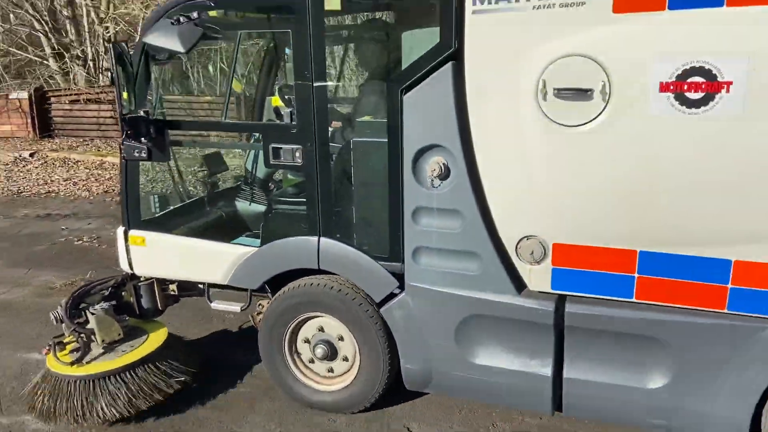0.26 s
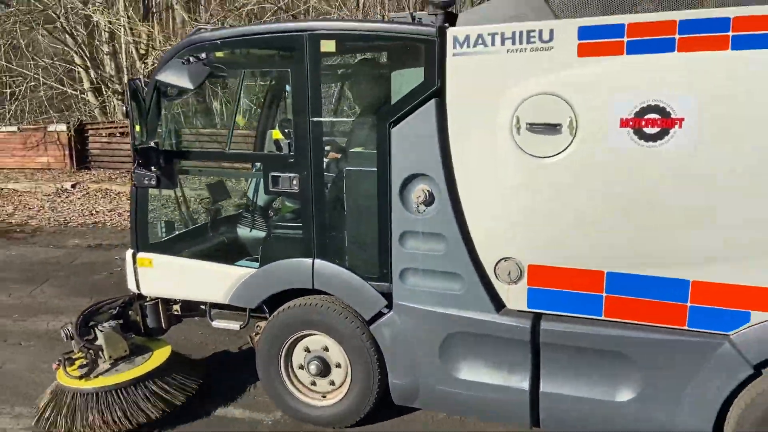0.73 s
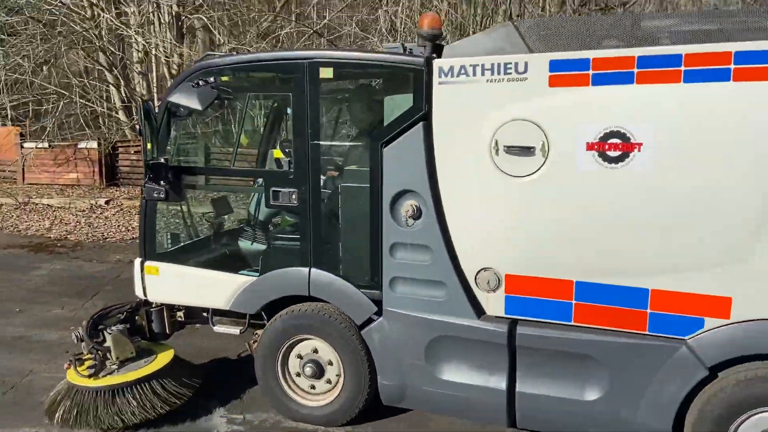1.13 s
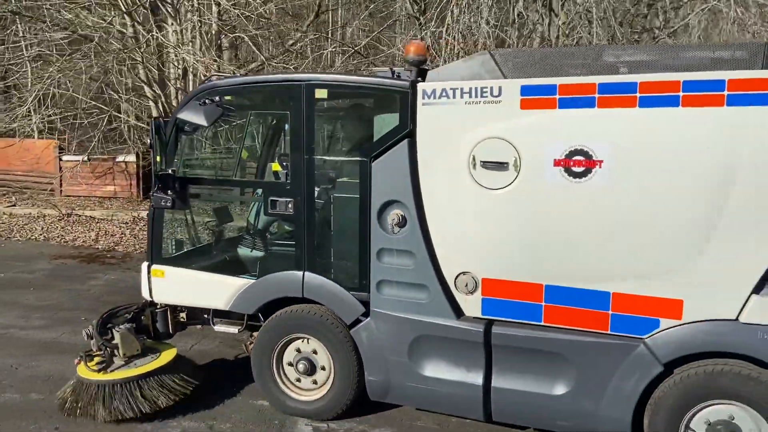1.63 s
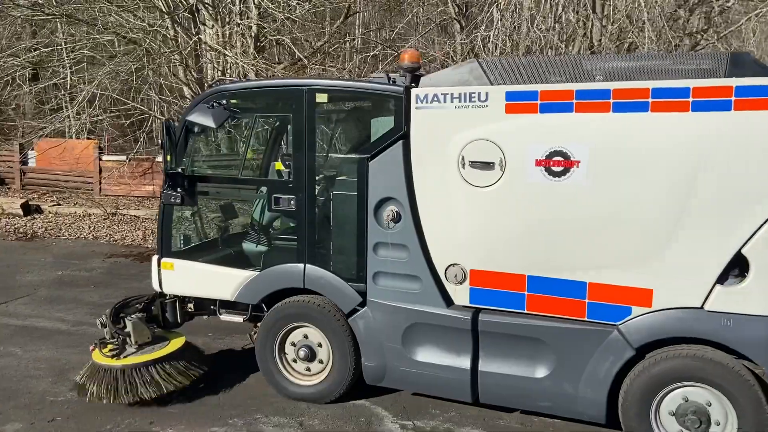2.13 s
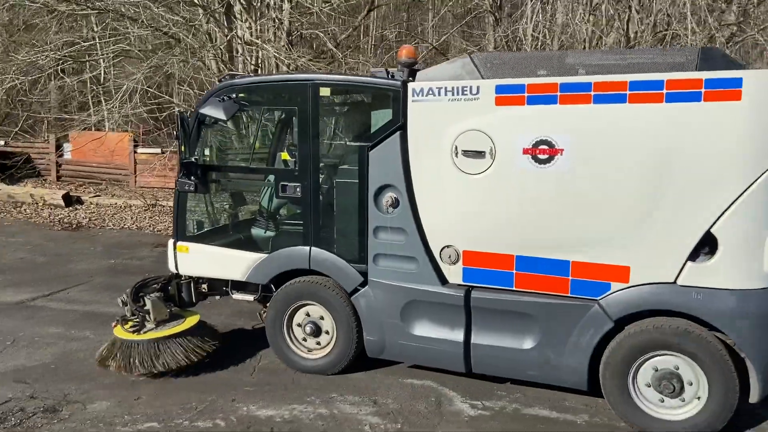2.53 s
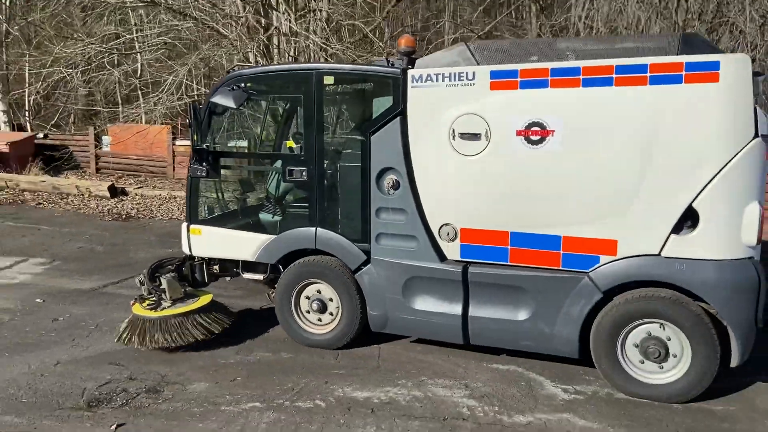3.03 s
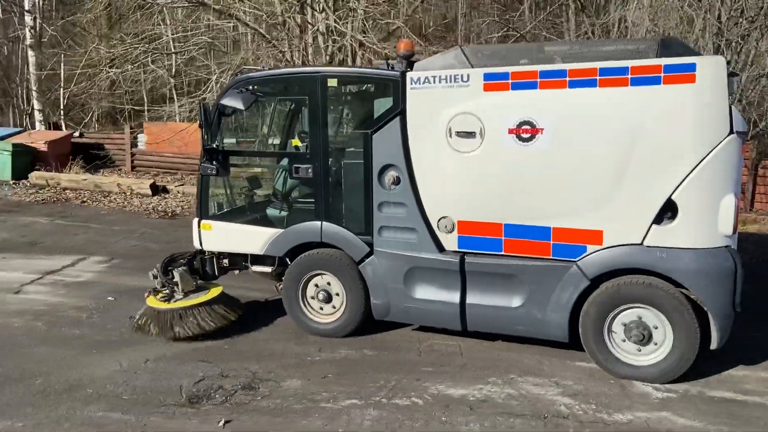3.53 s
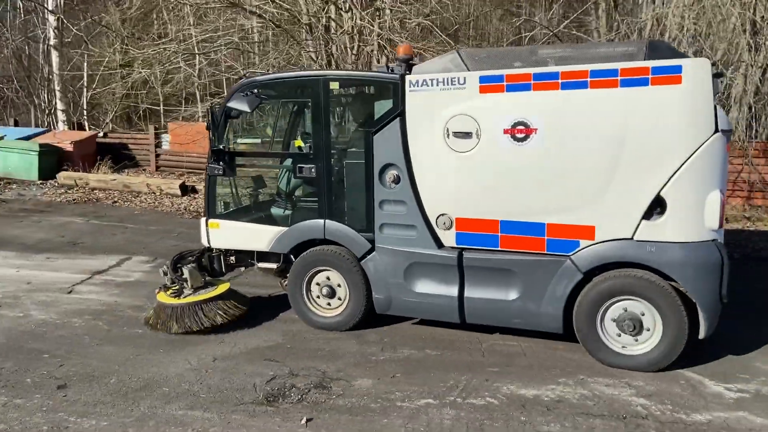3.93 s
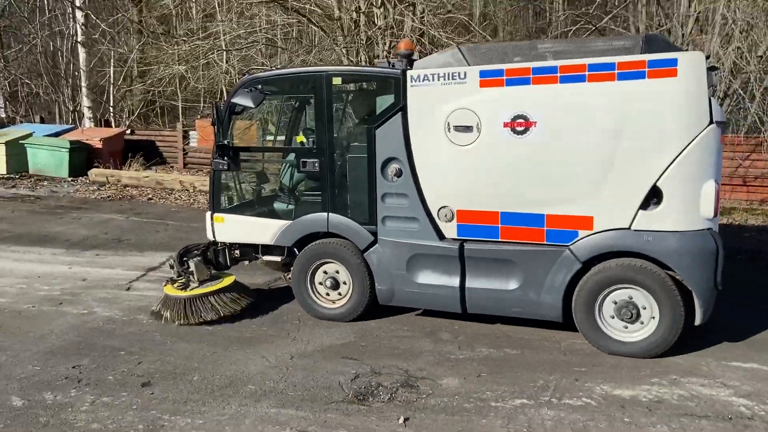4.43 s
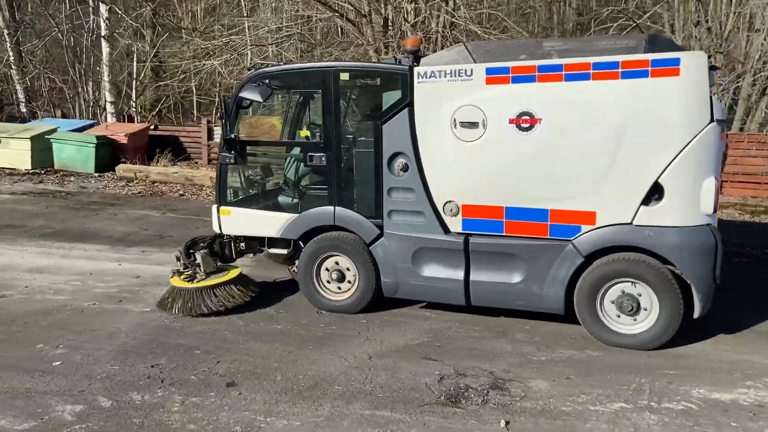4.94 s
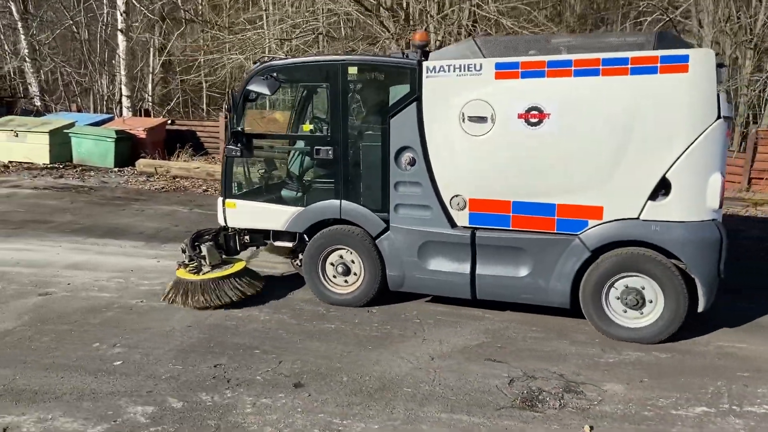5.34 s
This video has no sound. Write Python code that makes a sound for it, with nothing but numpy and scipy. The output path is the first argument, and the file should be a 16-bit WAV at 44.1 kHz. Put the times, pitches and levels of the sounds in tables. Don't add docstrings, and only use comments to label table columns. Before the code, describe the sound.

Steady diesel hum and hollow fan roar from a small sweeping machine, with constant bristle hiss, faint hydraulic whine and light wind buffeting.

```python
import sys
import numpy as np
from scipy import signal
from scipy.fft import rfft, irfft, next_fast_len
from scipy.io import wavfile

SR = 44100
rng = np.random.default_rng(int(sys.argv[2]) if len(sys.argv) > 2 else 0)


def wrap_up_sound(samples):
    columns = np.atleast_2d(samples).T
    tamed = np.clip(columns, -1, 1)
    steps = np.round(tamed * 32767).astype(np.int16)
    wavfile.write(sys.argv[1], SR, steps)


def convert_level_to_amplitude(level_db):
    exponent = np.asarray(level_db, float) / 20
    return 10 ** exponent


N = 245637
SIZE = next_fast_len(N + 4096)

# [t/s, engine firing rate f/Hz, fan blade rate f/Hz]
SHAFT_SPEEDS = [(0.0, 50.43, 306.92), (0.5, 50.322, 306.55), (1.0, 50.25, 306.06), (1.5, 50.307, 306.94),
                (2.0, 50.438, 308.07), (2.5, 50.515, 307.75), (3.0, 50.542, 307.68), (3.5, 50.438, 307.94),
                (4.0, 50.45, 308.34), (4.5, 50.495, 309.17), (5.0, 50.608, 309.69), (5.57, 50.628, 310.26)]


def rms_one(x):
    return x / np.sqrt(np.mean(x ** 2) + 1e-20)


def in_time(rows):
    s, *columns = np.transpose(rows)
    return [np.interp(np.arange(N) / SR, s, c) for c in columns]


def at_hz(points, hz, count=1):
    return np.interp(np.log(hz), np.log(np.array(points)[:, 0]), np.array(points)[:, count])


def bumps(rows):
    t = np.arange(N) / SR
    return sum(db * np.exp(-.5 * ((t - s) / half) ** 2) for s, db, half in rows)


def drift(rate):
    r = np.exp(-80 * np.pi * rate / SR)
    white = rng.standard_normal(N // 40 + 2002)
    slow = signal.lfilter([1], [1, -2 * r, r * r], white)[2000:]
    return np.interp(np.arange(N) / 40, np.arange(len(slow)), rms_one(slow))


def heard_db(near_db, spreading, follows=0, control_db=0):
    # [t/s, distance/m]
    distance = [(0, 2.62), (1.0, 3.34), (2.0, 3.26), (3.0, 3.77), (4.2, 4.5), (5.57, 4.65)]
    metres = in_time(distance)[0]
    return near_db - spreading * 20 * np.log10(metres / metres[0]) + follows * control_db


def tone(hz, level_db, wobble_db, wander, start=0):
    beat_peak_s = .082
    turns = np.cumsum(hz * np.ones(N)) / SR
    turns = turns - turns[round(beat_peak_s * SR)] + start
    phase = 2 * np.pi * turns + wander * drift(4.6)
    return np.sqrt(2) * convert_level_to_amplitude(level_db + wobble_db * drift(2.5)) * np.sin(phase)


def turbulence(spectrum, shared_db, own_db, rate, excite=None, count=4):
    hz = np.arange(SIZE // 2 + 1) * SR / SIZE + 1e-3
    white = rng.standard_normal((2, N)) if excite is None else excite
    low_hz, high_hz = spectrum[0][0], spectrum[-1][0]
    place = np.log(hz / low_hz) / np.log(high_hz / low_hz) * (count - 1)
    inside = np.log(np.minimum(hz / low_hz, high_hz / hz))
    fade = np.sqrt(np.clip(.5 + 25 * inside, 0, 1))
    coloured = rfft(white, SIZE) * convert_level_to_amplitude(at_hz(spectrum, hz)) * fade
    out, shared = 0, drift(rate)
    for k in range(count):
        share = np.clip(1 - np.abs(np.clip(place, 0, count - 1) - k), 0, 1)
        flicker_db = shared_db * shared + own_db * drift(rate)
        out = out + irfft(coloured * share, SIZE)[:, :N] * convert_level_to_amplitude(flicker_db)
    return rms_one(out)


def engine():
    # [multiple of the firing rate, nearest level/dB, share of the spreading loss]
    main_orders = [
        (1, -29.5, 0.54),
        (2, -26.5, 0.41),
        (3, -32, .2),
        (6, -29.5, 0.76),
    ]
    # [multiple of the firing rate, level/dB]
    side_orders = [(1.25, -41), (1.5, -43), (2.25, -39), (2.5, -45), (2.75, -40), (3.25, -42), (12, -48),
                   (13, -47), (15, -52)]
    # [row in the steady tones, t/s, depth/dB, half length/s]
    cancels = [(1, .32, -14, 0.069), (1, .72, -7, 0.11), (1, 2.83, -6, .07), (1, 3.98, -12, 0.071),
               (1, 4.3, -1.5, 0.59), (2, 1.64, -5.5, 0.59), (2, 2.4, -14, 0.18), (2, 7.7, -7, 0.11),
               (3, 1.5, -3.5, 0.46), (3, 2.5, -2, 0.34), (3, 3.23, -9, 0.28), (3, 4.13, -11, 0.14),
               (3, 5.2, -1, 0.14)]
    firing_hz = in_time(SHAFT_SPEEDS)[0]
    out = 0
    for k, (multiple, near_db, spreading) in enumerate(main_orders):
        dips = [c[1:] for c in cancels if round(c[0]) == k]
        level_db = heard_db(near_db, spreading) + bumps(dips)
        out = out + tone(round(multiple) * firing_hz, level_db, .6, .1)
    for multiple, level_db in side_orders:
        out = out + tone(multiple * firing_hz, level_db, 3.5, 0.66, rng.random())
    return out


def fan_tone():
    # [t/s, level/dB]
    blade_level = [(0, -24), (.4, -26.5), (1.0, -26), (1.5, -32.5), (2.0, -29.5), (2.2, -26.5), (2.45, -35),
                   (2.8, -27), (3.3, -27.5), (3.8, -24.5), (4.3, -25.5), (4.6, -24), (5.0, -25.5),
                   (5.2, -30), (5.4, -26), (5.57, -23)]
    # [t/s, depth/dB, half length/s]
    gulps = [
        (1.48, -8, .03),
        (2.25, -4, .025),
        (2.64, -8, .03),
        (2.92, -11, 0.047),
        (4.253, -9, 0.017),
        (4.713, -6, .02),
        (5.12, -15, 0.027),
    ]
    # [multiple of the blade rate, level against the blade tone/dB]
    overtones = [
        (1.5, -11),
        (3, -17),
    ]
    blade_hz = in_time(SHAFT_SPEEDS)[1]
    level_db = in_time(blade_level)[0] + bumps(gulps)
    out = tone(blade_hz, level_db, 1, .15)
    for multiple, db in overtones:
        out = out + tone(multiple * blade_hz, level_db + db, 1.8, 0.65)
    return out


def air_roar():
    # [t/s, level about the mean/dB]
    suction = [(0, -1), (.2, 1), (.5, -1.5), (.7, 3), (.92, -1.5), (1.25, 1), (1.7, -2.5), (2.02, 1),
               (2.2, 0), (2.35, 0.5), (2.6, 1.5), (2.95, -1.5), (3.25, 1), (3.6, 1), (4.5, -0.5),
               (4.9, 0.5), (5.4, -0.5), (5.57, -1)]
    # [f/Hz, level per Hz/dB]
    body_colour = [(22, -32), (38, -18), (46, -11), (60, -11.5), (85, -2.5), (120, -8.5), (170, -3.5),
                   (190, -1), (230, 1.5), (265, -5.5), (320, -5)]
    hopper_colour = [(318, -2.5), (340, -3), (368, 0.5), (395, 0.5), (430, -3)]
    fan_colour = [(430, 1.5), (460, -1.5), (480, -2.5), (535, -3.5), (570, -6), (640, -6.5), (760, -8.5),
                  (900, -8), (950, -11), (1000, -12)]
    hose_colour = [(1000, 1), (1080, -0.5), (1200, -2), (1350, -4.5), (1550, -5), (1850, -4.5), (2030, -8),
                   (2180, -7), (2330, -6)]
    suction_db = in_time(suction)[0]
    body_db = heard_db(-26.5, 0.22, 1, suction_db) + 2.0
    hopper_db = heard_db(-25, 1.56, 0.63, suction_db) + 0.3
    fan_db = heard_db(-26, 0.41, 0.23, suction_db) + 0.32
    hose_db = heard_db(-31.5, 0.095, 0.084, suction_db) + 0.5
    body_db = body_db + bumps([(0, -5, .12)])
    body = convert_level_to_amplitude(body_db) * turbulence(body_colour, shared_db=-0.46, own_db=0.2, rate=3.6)
    hopper = convert_level_to_amplitude(hopper_db) * turbulence(hopper_colour, shared_db=.5, own_db=-0.2, rate=7.1, count=2)
    fan = convert_level_to_amplitude(fan_db) * turbulence(fan_colour, shared_db=-0.15, own_db=0.68, rate=7.3, count=3)
    hose = convert_level_to_amplitude(hose_db) * turbulence(hose_colour, shared_db=0.45, own_db=0.48, rate=6.4, count=3)
    return body + hopper + fan + hose


def brushes():
    # [t/s, level about the mean/dB]
    pressure = [(0, 1), (.75, 0), (1.7, 0), (2.0, -0.6), (3.0, -2), (3.35, 0), (3.65, -1), (4.2, 1.8),
                (4.8, 2.3), (5.25, 0), (5.57, 0.7)]
    # [f/Hz, level per Hz/dB]
    scrub_colour = [(2330, -4), (2450, 0.5), (3100, 0.5), (3500, -3.5), (4500, -5), (5500, -8), (6300, -8)]
    hiss_colour = [(6300, -0.5), (8000, 0), (11000, -1), (13000, -1.5), (14800, -3.5), (15600, -2.5),
                   (16500, -4)]
    # [t/s, level over the steady scrub/dB, length/s]
    flicks = [
        (2.899, 6, .010),
    ]
    pressure_db = in_time(pressure)[0]
    scrub_db = heard_db(-35.5, 0.31, 0.27, pressure_db) + 1.0
    hiss_db = heard_db(-39, .05, 0.76, pressure_db) + 3.0
    t = np.arange(N) / SR
    shake_db = .22 * np.sin(2 * np.pi * np.cumsum(in_time(SHAFT_SPEEDS)[0]) / SR)
    for s, level_db, length in flicks:
        shake_db = shake_db + level_db * ((t > s) & (t < s + length))
    slips = (rng.random((2, N)) < 36000 / SR) * rng.standard_normal((2, N))
    scrub = convert_level_to_amplitude(scrub_db) * turbulence(scrub_colour, shared_db=0.37, own_db=0.65, rate=9.5)
    hiss = convert_level_to_amplitude(hiss_db) * turbulence(hiss_colour, shared_db=0.12, own_db=0.37, rate=5.9, excite=slips)
    return convert_level_to_amplitude(shake_db) * (scrub + hiss)


def pump_whine():
    # [t/s, level over idle/dB, half length/s]
    effort = [
        (1.65, 7, .2),
        (2.25, 15, .5),
        (4.45, 10, .6),
    ]
    free_hz, loaded_hz, sag_hz_per_s = 1962, 1952, 10
    shift_s, shift_takes_s, idle_db = 3.2, .2, -58
    t = np.arange(N) / SR
    free_share = .5 - .5 * np.tanh((t - shift_s) / shift_takes_s)
    hz = loaded_hz + (free_hz - loaded_hz) * free_share
    hz = hz - sag_hz_per_s * np.maximum(t - shift_s, 0)
    return convert_level_to_amplitude(0.5) * tone(hz, idle_db + bumps(effort), 1.5, 0.53)


def gear_whistles():
    # [f/Hz, width/Hz, level/dB, loudest t/s, span/s]
    whistles = [(830, 2, -44, 3.4, 1.6), (1379, 4, -45, .5, .9), (1386, 5, -50, 3.6, 1.5),
                (1493, 3, -50, 1.3, .8), (1694, 4, -48, 4.0, .8), (1768, 9, -45, 4.4, .35),
                (1809, 6, -42, .5, .4), (1809, 6, -45, 4.2, .5), (1842, 12, -44, .8, .35),
                (1850, 4, -48, 2.2, .5), (2298, 6, -51, 5.1, .4)]
    t = np.arange(N) / SR
    out = np.zeros(N)
    for hz, width_hz, level_db, peak_s, span_s in whistles:
        r = np.exp(-np.pi * width_hz / SR)
        poles = [1, -2 * r * np.cos(2 * np.pi * hz / SR), r * r]
        once = signal.lfilter([1, 0, -1], poles, rng.standard_normal(N))
        twice = signal.lfilter([1, 0, -1], poles, once)
        swell = np.exp(-.5 * ((t - peak_s) / span_s) ** 2)
        out += convert_level_to_amplitude(level_db) * swell * rms_one(twice)
    return out


def breeze():
    # [f/Hz, level per Hz/dB]
    wind_colour = [(22, -25), (43, -8), (55, 0), (70, -4), (105, 0), (150, -9), (215, -8), (300, -7)]
    # [t/s, level/dB, half length/s]
    gusts = [
        (.4, 11, .12),
        (.78, 13, 0.13),
        (1.85, 9, .15),
        (2.7, 4, .2),
        (4.1, 6, 0.088),
        (4.7, 4, 0.11),
    ]
    calm_db, freshen_s, freshen_db_per_s = -49, 2.3, 5
    lumps_db = 2.0 * np.array([drift(12), drift(13)])
    freshening_db = freshen_db_per_s * np.maximum(np.arange(N) / SR - freshen_s, 0)
    wind_db = calm_db + freshening_db + bumps(gusts) + 1.5 + lumps_db
    return convert_level_to_amplitude(wind_db) * turbulence(wind_colour, shared_db=-1.0, own_db=3.5, rate=8, count=3)


def port_pair(common, other):
    # [f/Hz, likeness 0-1, left minus right level/dB, right leads by/radians]
    ports = [(50, 1, 0.4, 0.097), (180, 1, -0.3, 0.08), (300, 1, -1.5, 0.15), (395, 1, -2, 0.09),
             (550, 0.89, 2, 0.13), (790, 0.85, 0, 0.27), (1150, 0.98, -1.5, 0.55), (1350, 0.57, 4, -0.13),
             (1710, 0.92, 1, 0.69), (2400, 0.83, 0, -0.068), (3100, 0.78, 2.5, -0.18),
             (3820, 0.96, 4.5, -.1), (4600, 0.72, 4.5, -.1), (5300, 0.97, 9, .3), (5470, 0.3, 12, .2),
             (6070, 0.8, 5, -.25), (6400, 1, 0, 0)]
    # [t/s, extra right lead/radians]
    bearing = [(0, 0.39), (1.2, 0.26), (2.0, -0.036), (2.8, 0.11), (3.6, -.1), (4.4, -.14), (5.57, -.17)]
    # [f/Hz, share of that extra lead]
    bearing_reach = [(80, -0.068), (250, 0.49), (500, 1), (2500, 0.78), (3500, -.2), (6000, -0.13)]
    split_hz, in_phase_hz, turn_hz = 7200, 6960, 4170
    hz = np.arange(SIZE // 2 + 1) * SR / SIZE + 1e-3
    alike = np.clip(at_hz(ports, hz, count=1), 0, 1)
    lean = convert_level_to_amplitude(at_hz(ports, hz, count=2) / 2)
    late_lead = 2 * np.pi * (hz - in_phase_hz) / turn_hz
    lead = np.where(hz < split_hz, at_hz(ports, hz, count=3), late_lead)
    left = rfft(common, SIZE)
    own = np.sqrt(1 - alike ** 2) * rfft(other, SIZE)
    right = (alike * left * np.exp(1j * lead) + own) / lean
    quarter_turn = 1j * at_hz(bearing_reach, hz) * right
    left, right, quarter_turn = irfft(np.array([left * lean, right, quarter_turn]), SIZE)[:, :N]
    return np.array([left, right + in_time(bearing)[0] * quarter_turn])


def scene():
    tones = engine() + fan_tone() + pump_whine() + gear_whistles()
    noise, scattered = air_roar() + brushes()
    return port_pair(tones + noise, scattered) + breeze()


def top_cut(x):
    return signal.sosfilt(signal.butter(12, 17080, fs=SR, output="sos"), x)


def record(dry):
    steep = signal.ellip(14, .3, 90, 15740, fs=SR, output="sos")
    mix = signal.sosfilt(steep, dry)
    return top_cut(mix)


dry = scene()
out = record(dry)
wrap_up_sound(out)
```